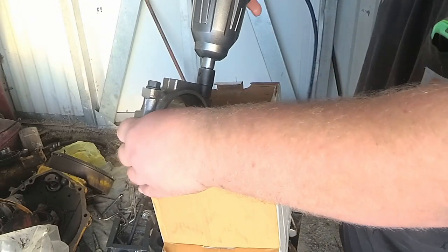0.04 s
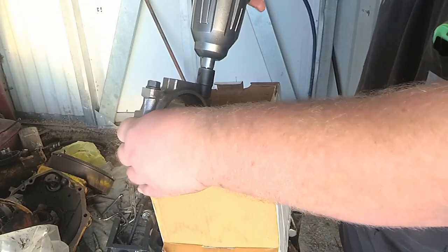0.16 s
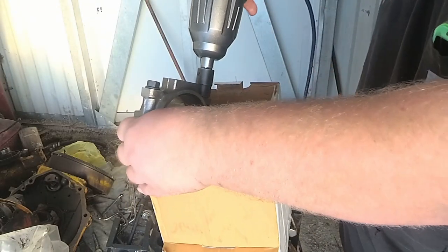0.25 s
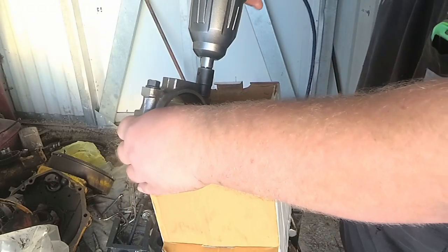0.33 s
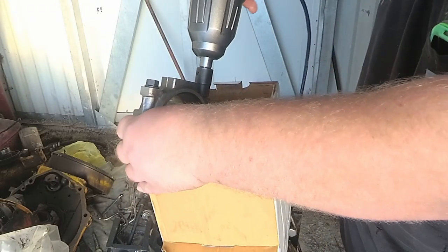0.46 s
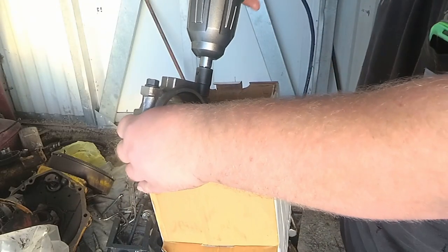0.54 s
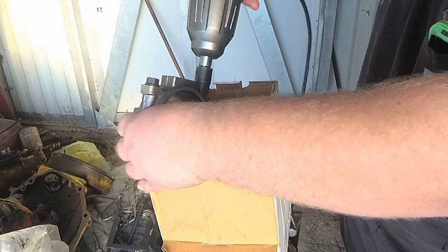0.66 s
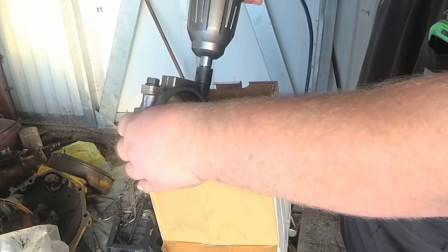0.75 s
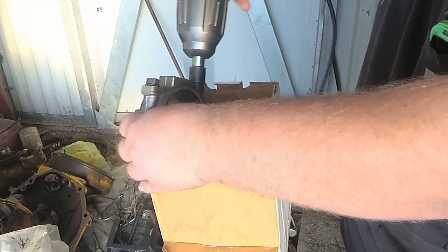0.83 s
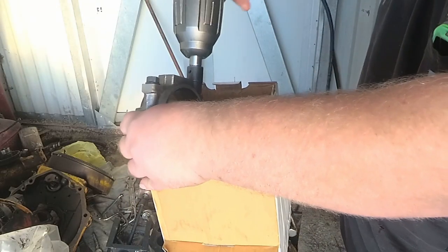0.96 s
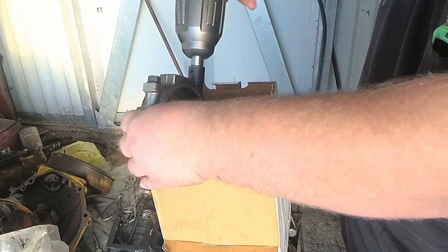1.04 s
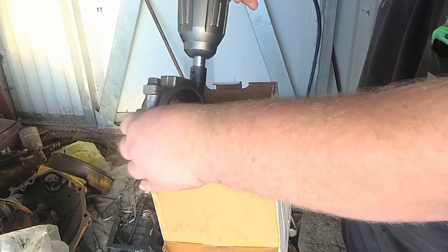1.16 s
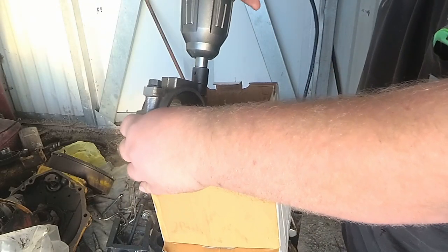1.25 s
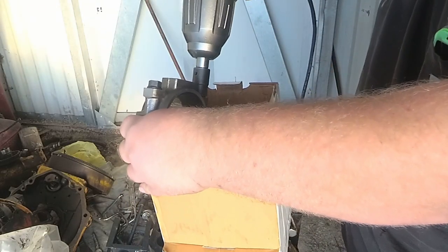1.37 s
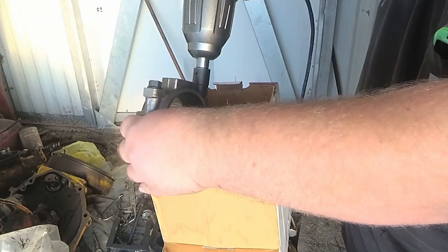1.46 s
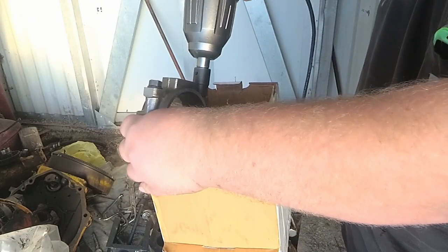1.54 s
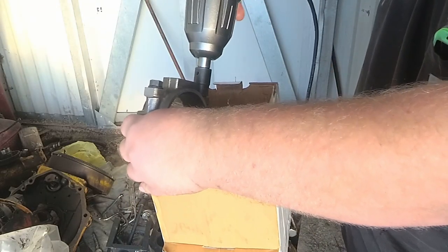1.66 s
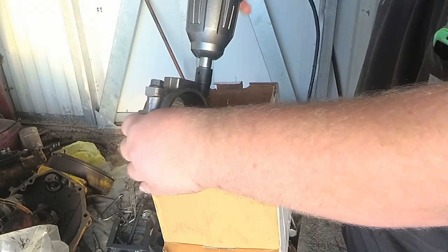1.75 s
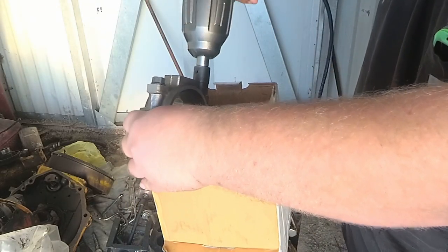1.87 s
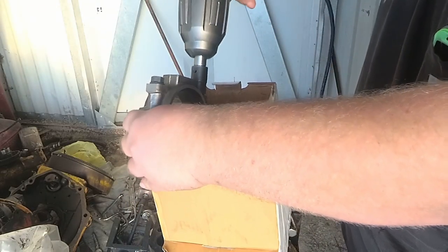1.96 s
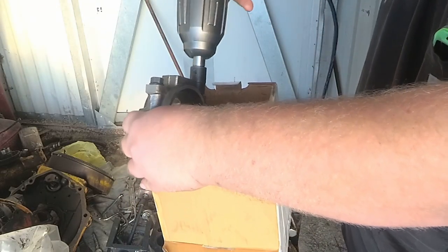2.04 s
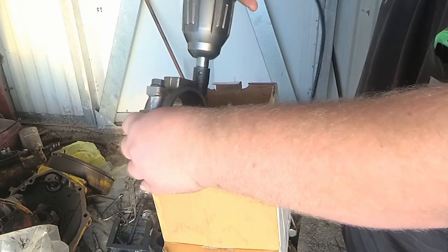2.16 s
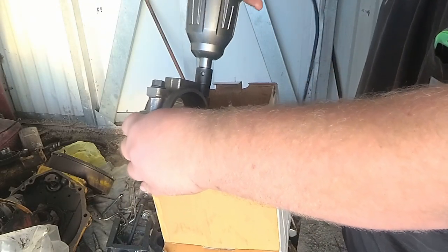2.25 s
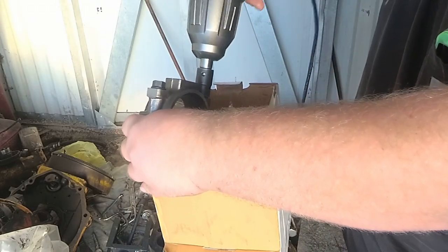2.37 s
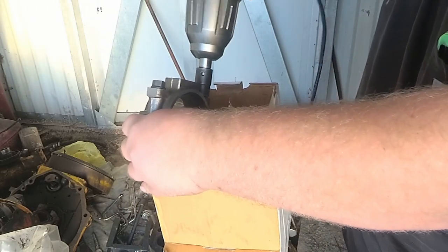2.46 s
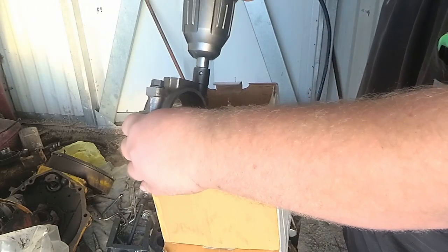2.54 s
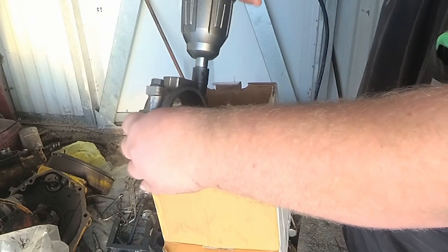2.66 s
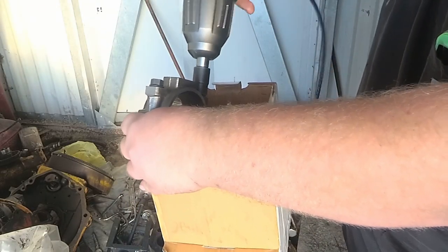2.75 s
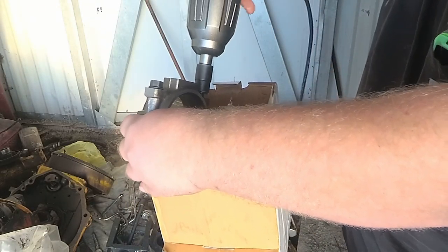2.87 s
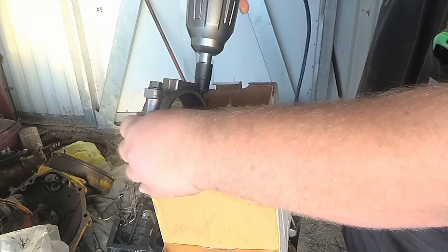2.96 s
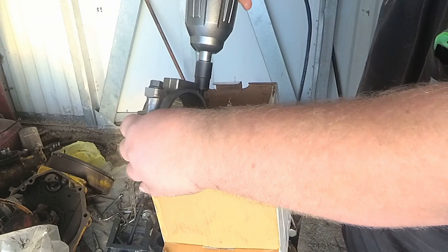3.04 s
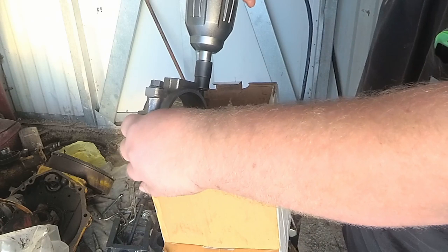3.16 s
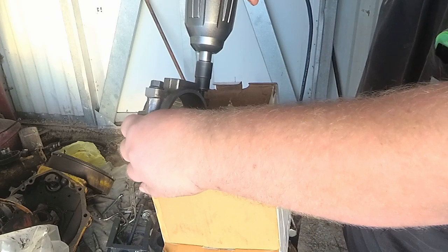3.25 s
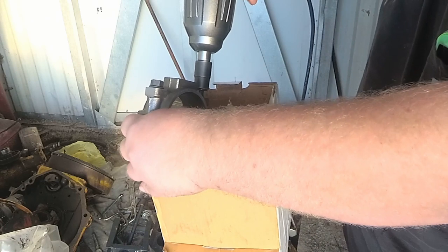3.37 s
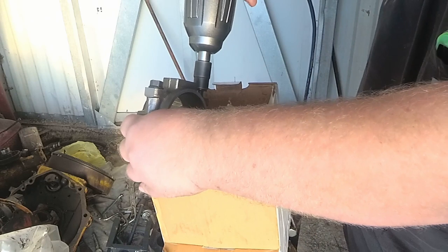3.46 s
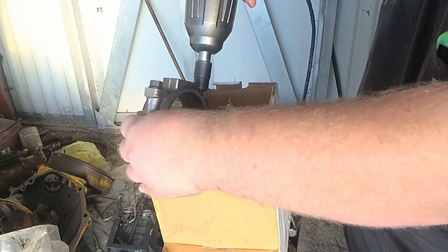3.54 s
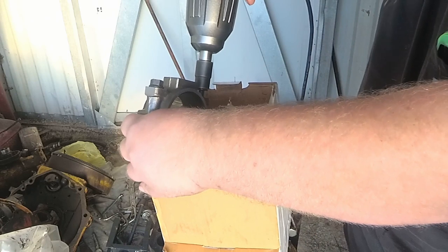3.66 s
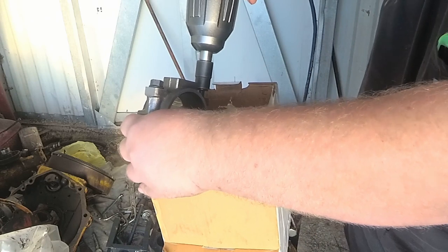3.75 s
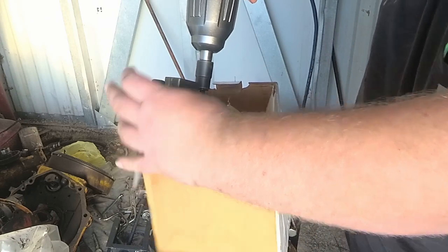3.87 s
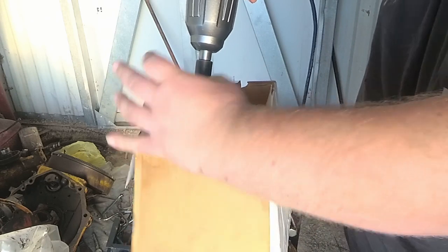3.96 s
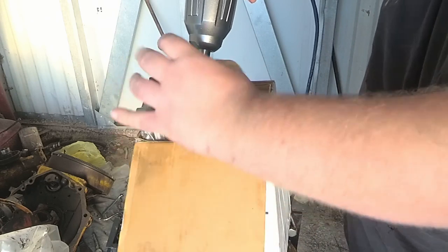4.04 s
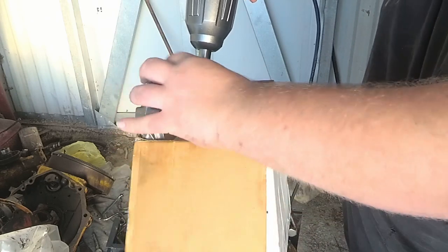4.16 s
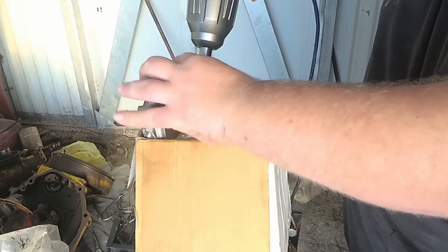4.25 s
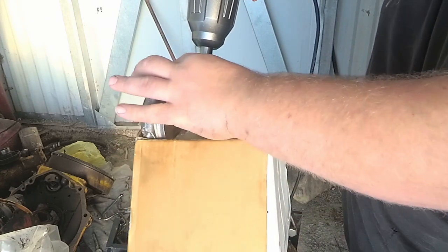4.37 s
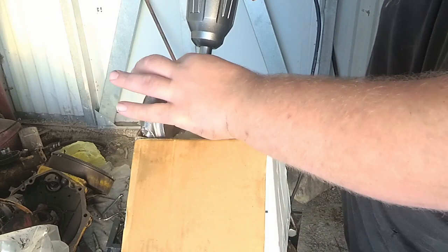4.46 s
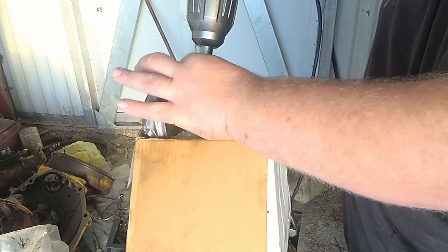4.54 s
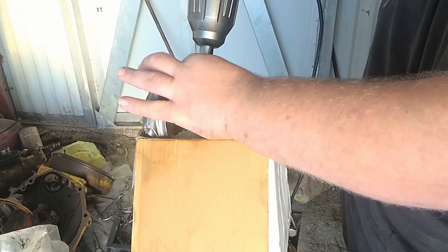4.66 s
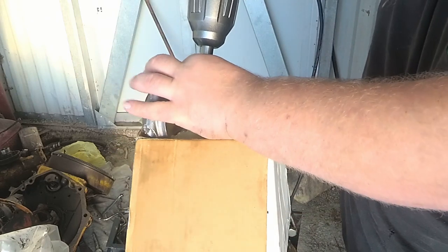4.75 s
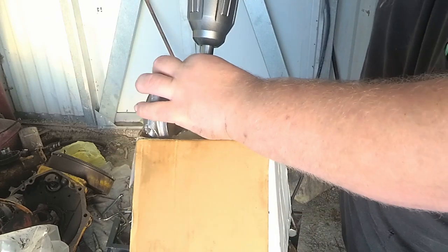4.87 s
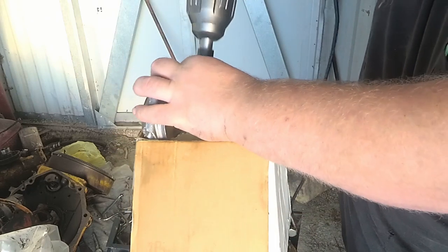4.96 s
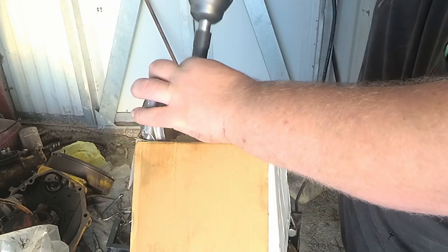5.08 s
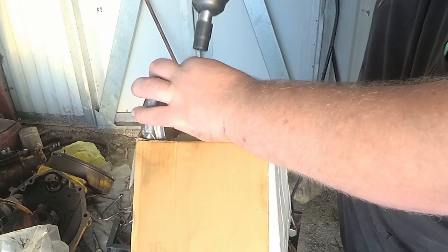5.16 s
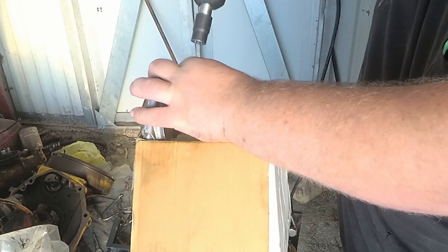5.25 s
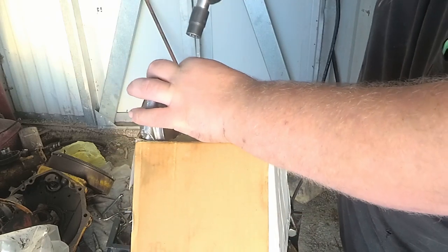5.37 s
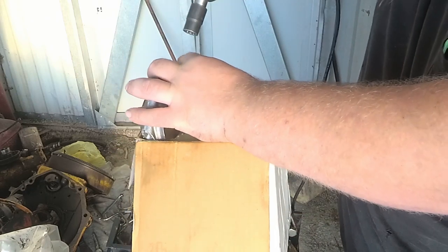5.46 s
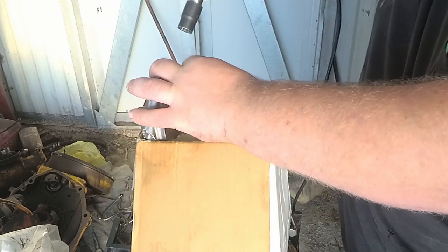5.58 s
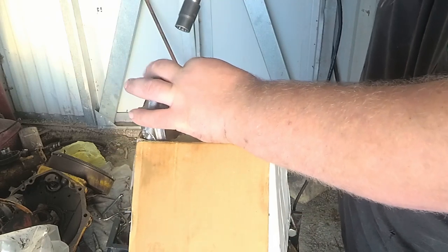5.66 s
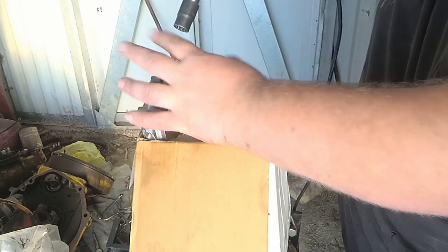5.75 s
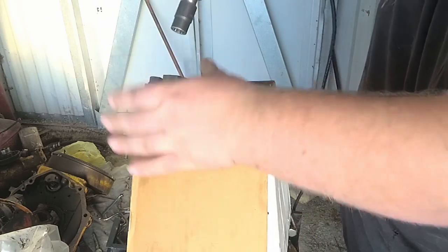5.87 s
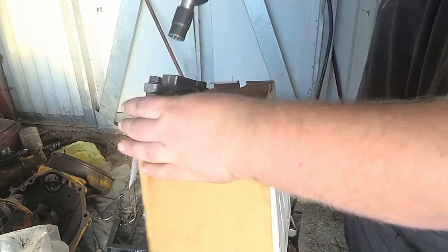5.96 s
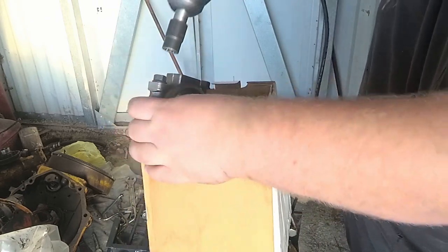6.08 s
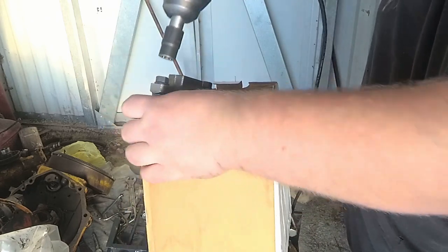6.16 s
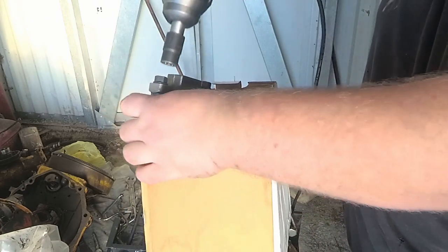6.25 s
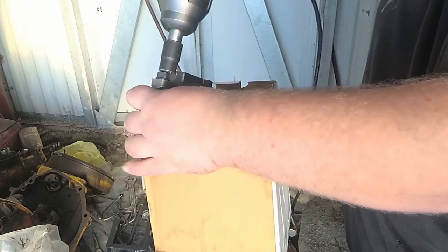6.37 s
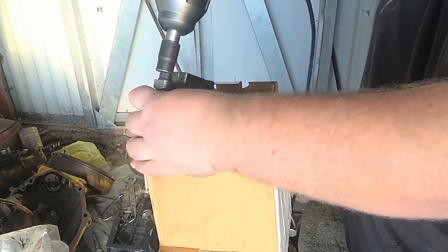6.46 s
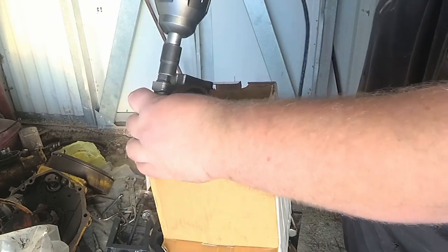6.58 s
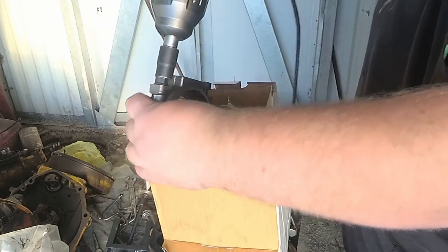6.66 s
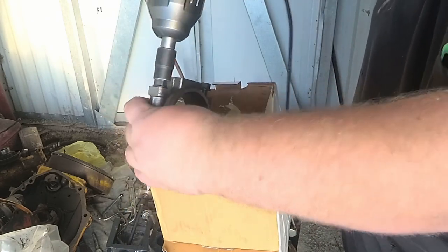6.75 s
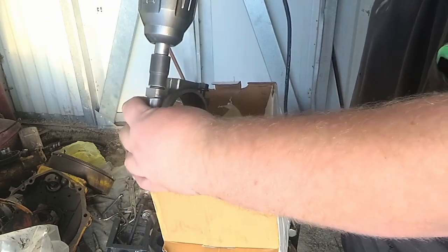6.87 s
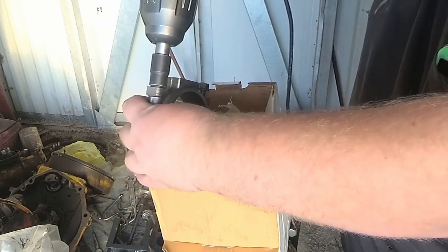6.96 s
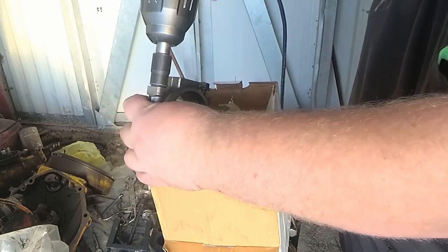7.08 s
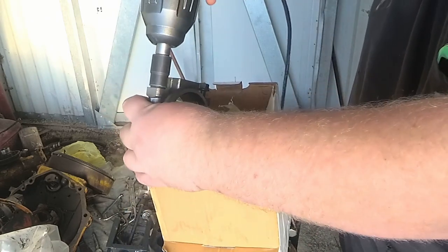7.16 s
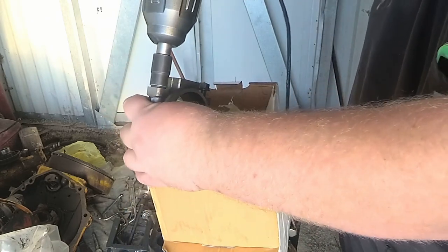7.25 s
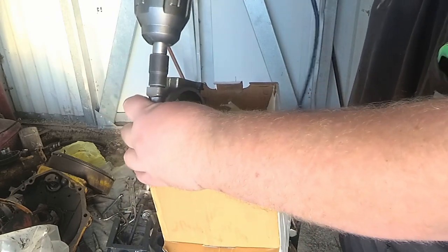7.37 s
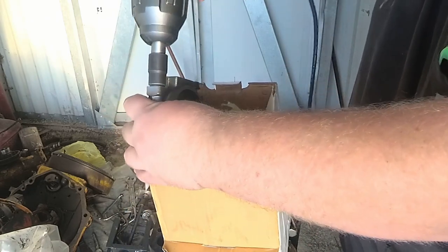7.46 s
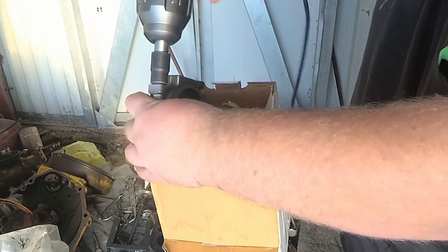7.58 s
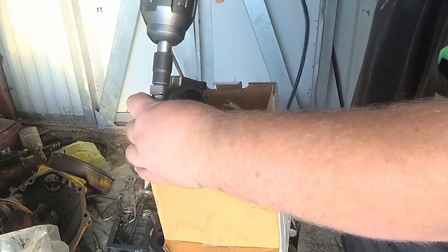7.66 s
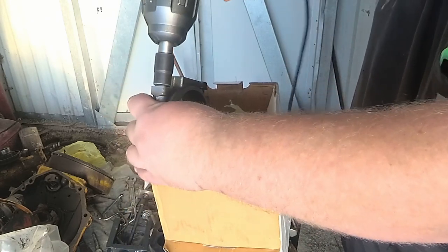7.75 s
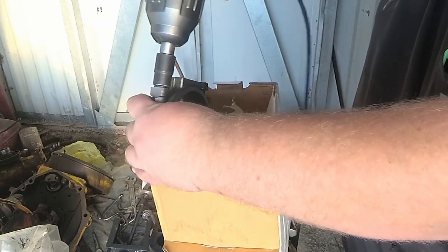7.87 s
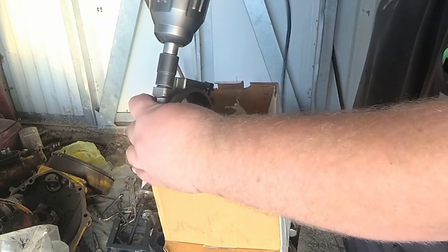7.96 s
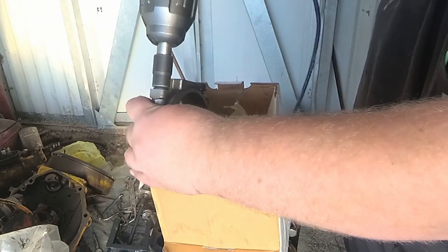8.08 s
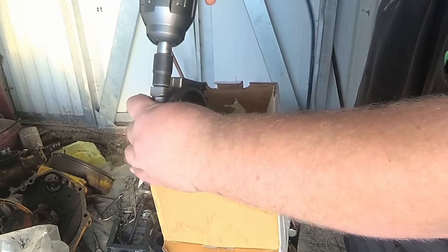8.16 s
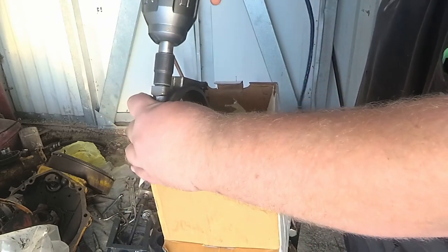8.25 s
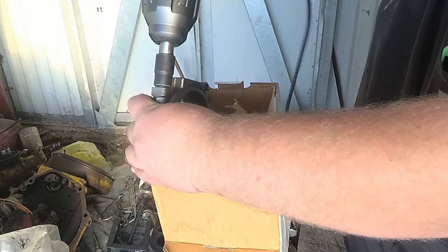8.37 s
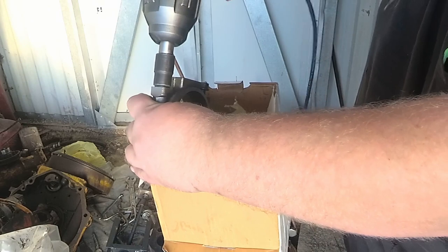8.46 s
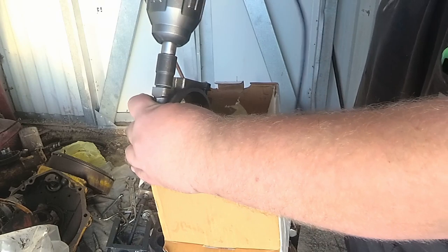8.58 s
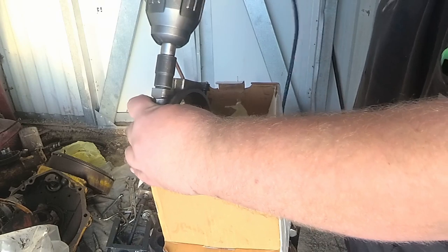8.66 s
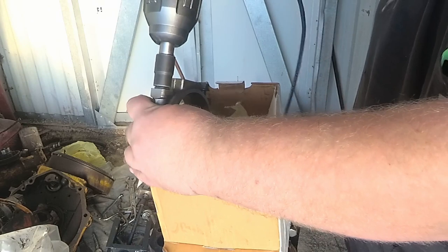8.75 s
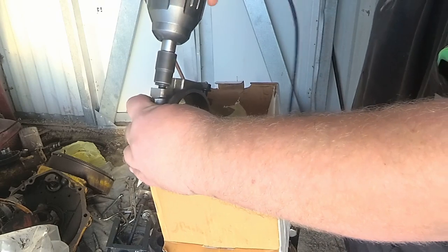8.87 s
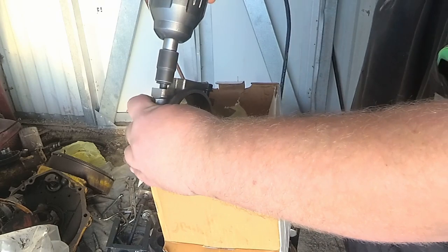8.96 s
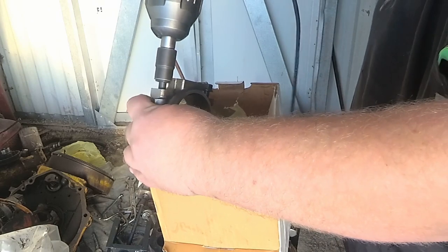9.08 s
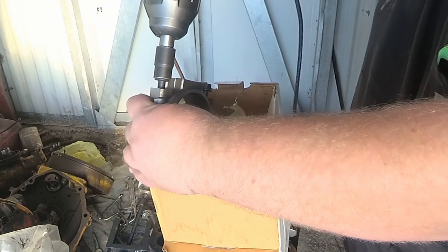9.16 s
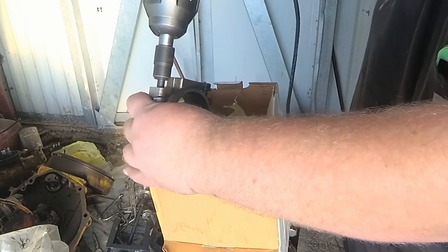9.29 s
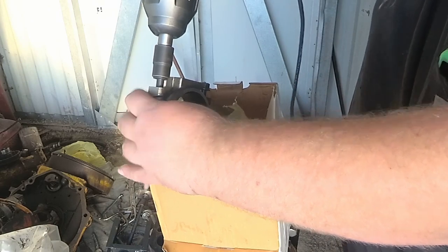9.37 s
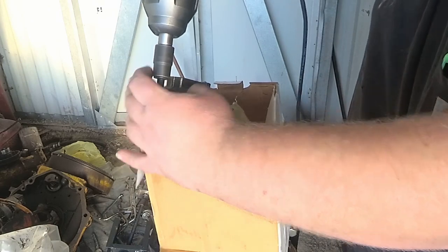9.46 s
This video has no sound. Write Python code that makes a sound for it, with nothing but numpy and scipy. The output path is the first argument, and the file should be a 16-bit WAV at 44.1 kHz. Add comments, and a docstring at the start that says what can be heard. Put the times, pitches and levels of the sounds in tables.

```python
"""An electric impact wrench hammers bolts loose on a part held on a wooden block, in a sheet-metal workshop.
Blows are noise bursts and ringing modes; gear rattle and brush hiss are coloured noise, free gears whine.
Twice the bolt runs free and the motor coasts down; between bolts hands scrape and brush, the socket clinks.
A close stereo microphone hears the tool on its right, with wall echoes and room noise; the loudest blows clip."""
import sys
import numpy as np
from scipy import signal
from scipy.fft import rfft, irfft
from scipy.io import wavfile
from scipy.ndimage import uniform_filter1d

SR = 44100
rng = np.random.default_rng(int(sys.argv[2]) if len(sys.argv) > 2 else 0)


def int16_out(signal):
    """Quantize to a 16-bit WAV file."""
    q = np.round(np.clip(np.atleast_2d(signal).T, -1, 1) * 32767)
    wavfile.write(sys.argv[1], SR, q.astype(np.int16))


N = 419832

# hammer on anvil, with the click of the trigger at 0.78 s among them: start_s, blow_db, jolt_db (through the
# bench)
BLOWS = [(0.768, -22.5, -67), (0.7798, -12, -56), (0.8193, -2.5, -46), (0.853, 3, -37), (0.867, -9, -44),
         (0.9008, 1.5, -44), (0.939, 5, -41), (0.9874, 1.5, -48.5), (1.057, 5.5, -44.5), (1.776, -18, -44),
         (1.8223, 6, -26), (1.8647, 5.5, -36.5), (1.914, 2, -42), (1.9435, -3, -48.5), (1.979, -0.5, -41),
         (2.03, 1, -22), (2.0544, -11, -23.5), (2.0804, -6, -47.5), (2.1124, -3.5, -42.5), (2.141, -4, -40),
         (2.1763, -1.5, -33), (2.219, -1.5, -31), (2.2741, -1.5, -43.5), (2.361, 3.5, -31),
         (2.5209, -3.5, -38.5), (2.5624, 1.5, -37), (2.599, -0.5, -33.5), (2.6336, -1.5, -25.5),
         (2.6626, -6, -35), (2.697, -1, -34.5), (2.724, -6, -37.5), (3.1514, -8.5, -33), (7.295, -22, -58),
         (7.323, -26, -59), (7.356, -14, -33), (7.3863, 4.5, -29), (7.4582, 6, -24), (7.541, 0.5, -39),
         (7.5985, -2.5, -39), (7.6901, 4.5, -43), (7.998, -12.5, -49), (8.0469, -8, -25.5),
         (8.08, 2.5, -32.5), (8.113, 0.5, -32), (8.147, -0.5, -31), (8.188, 0, -45), (8.2198, -2.5, -52),
         (8.2655, 1.5, -49), (8.349, 2, -21.5), (8.631, -22, -53), (8.671, -12, -33), (8.692, 2.5, -23),
         (8.7302, 3.5, -35), (8.7662, -2.5, -43), (9.3043, -8.5, -66)]
# one row a free run: rattle_db (at the reference speed), carrier_start (share of a turn)
FREE_RUNS = [(-30.5, 0.25), (-9.5, 0.66), (-9.5, 0.59)]
# likeness of the left and right microphone: pitch_hz, likeness (0 to 1)
LIKENESS = [(60, 0.26), (120, 0.45), (240, 1), (480, 0.94), (950, 0.77), (1890, 0.46), (3770, 0.73),
            (7520, 0.14), (15000, 0.16)]


def hammer():
    """Each blow: chatter of case, thump of block, crack, a jolt through the bench, one rebound, ringing steel."""
    # block under the hammer: pitch_hz, level_db (per Hz)
    block_colour = [(88, -36), (150, -12.5), (238, 2), (399, 3.5), (522, -4.5), (591, 1.5), (639, -5.5),
                    (895, -2), (1060, -3), (1240, 3.5), (2200, -20), (2860, -37.5), (4840, -120)]
    # hiss of the crack: pitch_hz, level_db (per Hz)
    crack_colour = [(3530, -32.5), (6000, -3), (6230, -8.5), (7610, -6.5), (9980, -7.5), (11200, -4.5),
                    (14600, -4.5), (15600, -10), (16000, -29.5)]
    # shocks through the bench: pitch_hz, level_db (per Hz)
    jolt_colour = [(15, -7.5), (40, -14.5), (100, -1), (180, 4.5), (260, -1.5), (500, -51.5)]
    # modes of the bolted steel part: pitch_hz, level_db, t60_s
    steel_modes = [(2390, -22, .55), (2440, -24, .5), (2880, -23, .6), (2960, -22, .85), (3030, -21.5, .8),
                   (3100, -24, .55), (3900, -2, .12), (4180, -3, .13), (4370, -5, .1), (5430, -6, .2),
                   (5700, -8, .12)]
    # parts of the case that a blow may favour: low_hz, high_hz
    case_parts = [(0, 2700), (2700, 3600), (3600, 4900), (4900, 22050)]
    colour_spread_db, clang_spread_db = 3, 5

    start, blow_db, jolt_db = np.transpose(BLOWS)
    late, low, high, *favour = rng.uniform(-1, 1, (len(start), 3 + len(case_parts))).T
    thump_db = blow_db - 16 + colour_spread_db * low
    crack_db = blow_db - 9 + colour_spread_db * high
    rebound = start + .021 * (1 + .1 * late)  # about 21 ms after the blow

    def hit(db):
        return strikes(start, db - 5) + strikes(rebound, db - 11)

    def shake(db):
        return 0.63 * burst(hit(db), 0.0016, 0.08) + 0.52 * burst(hit(db), 0.0007, 0.022)

    case, block, treble, bench = voices(housing, block_colour, crack_colour, jolt_colour)
    # socket and anvil knock in their play
    loose = grit(per_s=190, spread_db=3.0, smooth=.8, knock_s=.0035)
    chatter = np.zeros((2, N))
    for (lo, hi), favoured in zip(case_parts, favour):
        part = shaped(case, lambda hz: (hz >= lo) & (hz < hi))
        chatter += part * shake(blow_db + clang_spread_db * favoured)
    crack = burst(hit(crack_db), .0002, 0.06) + 0.67 * burst(strikes(start, crack_db), .0001, 0.0054)
    thump = block * burst(hit(thump_db), 0.0046, 0.11)
    left_right = gain_of([[-7], [2.5]])
    jolt = left_right * bench * burst(strikes(start, jolt_db), 0.00047, 0.13)
    steel = ring(strikes(start, blow_db - 25.5), steel_modes)
    return loose * (chatter + treble * crack) + thump + jolt + steel


def motor():
    """Noise rattle of gears, drone and hum of the shell and brush hiss, with the free gears' whine and throb."""
    # shell of the running tool: pitch_hz, level_db (per Hz)
    drone_colour = [(40, -29.5), (100, -29), (200, -6.5), (310, -4.5), (530, -4), (680, -9.5), (780, -8.5),
                    (820, -5), (865, -5), (1100, -9.5), (1440, -5.5), (2000, -3.5), (2600, -34.5),
                    (4400, -100)]
    # brushes and fan: pitch_hz, level_db (per Hz)
    brush_colour = [(4500, -19.5), (6200, 3.5), (7000, -6), (8300, -3.5), (9300, -9), (10200, -8),
                    (10850, -5.5), (11800, -10), (13200, -3.5), (14300, -11.5), (15300, -9.5), (16200, -24)]
    # steady hum of the shell: pitch_hz, level_db (per Hz)
    hum_colour = [(90, -25.5), (220, -9.5), (420, -9), (720, -17), (790, -3), (820, 2), (855, -7.5),
                  (950, -20.5), (1400, -24), (3000, -60)]
    whine, throb = gears()
    layers = voices(housing, drone_colour, brush_colour, hum_colour) * turning()[:, None]
    rattle = layers.sum(0) * grit(per_s=520, spread_db=3.5, smooth=2.1, knock_s=0.0023)
    sound = throb * gain_of(-4.5) * rattle + throb ** 1.4 * whine
    return shaped(sound, lambda hz: hz ** 3 / (hz ** 3 + 130 ** 3))  # the motor sounds with little below about 130 Hz


def gears():
    """Free-running gear teeth: a rough whine on the mesh multiples, and a throb once a carrier turn."""
    # multiples of the tooth mesh: multiple, coasting_db, driven_db
    mesh_orders = [(1, 3, -4), (2, -1.5, 8), (3, 4, -3), (4, 1.5, -3), (5, -2, -6), (6, -4, -7)]
    # path from teeth to air: pitch_hz, level_db
    mesh_path = [(150, -7), (260, 2), (350, 2), (520, 5), (620, -8), (800, -10), (1150, -10), (1550, 4.5),
                 (2050, -3), (2300, 9), (2480, -2), (3150, 12), (3600, 5), (4050, 12), (4700, 2), (5500, 8),
                 (6500, -4), (8000, -8)]
    # one whine level a free run, at the reference speed, before order and path: level_db
    whine_levels = [-41, -31.5, -32]
    meshes_per_turn = 49.6  # of the gear carrier
    whine_db_per_halving, drive_fade_s = 8.5, .045
    throb_db, throb_db_per_halving, throb_most_db = 1.8, 2.0, 3.2
    throb_fades_hz = 260  # below this mesh speed the throb evens out

    whine, throb = np.zeros(N), np.ones(N)
    for (on, since, hz), (_, carrier_start), whine_db in zip(free_runs(), FREE_RUNS, whine_levels):
        whine_db = whine_db - whine_db_per_halving * halvings(hz)
        depth_db = np.clip(throb_db + throb_db_per_halving * halvings(hz), 0, throb_most_db)
        depth_db = depth_db * np.minimum(hz / throb_fades_hz, 1)
        # driven while the speed rises, coasting while it falls
        fade = np.exp(-1 / (drive_fade_s * SR))
        driven = signal.lfilter([1 - fade], [1, -fade], np.gradient(hz) > 0, zi=[1.])[0]
        meshes = np.cumsum(hz) / SR
        edges = np.minimum(np.minimum(since, since[::-1]) / .02, 1)  # 20 ms fades
        turn = np.cos(2 * np.pi * (meshes / meshes_per_turn + carrier_start))
        throb[on] = gain_of(edges * depth_db * turn)
        for k, coast_db, driven_db in mesh_orders:
            # uneven teeth smear every multiple on its own, the high ones most
            keep = np.exp(-np.pi * (25 + 26 * k) / SR)
            flutter = signal.lfilter([1], [1, -2 * keep, keep ** 2], rng.standard_normal((2, len(hz))))
            flutter = .65 + .55 * (evened(flutter[0]) + 1j * evened(flutter[1]))
            order_db = coast_db + (driven_db - coast_db) * driven
            level = edges * gain_of(whine_db + order_db + read(mesh_path, k * hz))
            whine[on] += (level * flutter * np.exp(2j * np.pi * k * meshes)).real
    return whine, throb


def turning():
    """Gains of rattle, drone, hiss and hum: trigger pulls, the shake after each blow, and speed when free."""
    # trigger pulls against a tight bolt: start_s, let_go_s, pull_db
    pulls = [(0.791, 0.992, -15), (1.774, 2.25, -17.5), (2.473, 2.73, -17.5), (7.306, 7.62, -12),
             (7.992, 8.283, -13), (8.63, 8.8, -16.5)]
    # The next five hold one value a layer: rattle, drone, hiss, hum.
    # at the start of a pull, relative to the loaded level: level_db
    spin_up_db = np.c_[[-20, -14.5, -36, -13]]
    # under load, relative to the pull: level_db
    loaded_db = np.c_[[0.5, -9, -5.5, -25]]
    # rattling on after a blow, relative to the blow: level_db
    shaken_db = np.c_[[-15, -21.5, -24, -36.5]]
    # turning free, relative to the free run: level_db
    free_db = np.c_[[-1, -23.5, -8, -23]]
    # loss as the speed halves: loss_db
    db_per_halving = np.c_[[8.25, 3.6, 10.5, 14]]
    spin_up_s, stop_db_per_s, shaken_t60_s, break_free_s = 0.056, 144, 0.28, 0.1

    t, power = np.arange(N) / SR, np.zeros((4, N))
    for start, end, pull_db in pulls:
        rising = np.clip(1 - (t - start) / spin_up_s, 0, 1)
        pull_db = pull_db - stop_db_per_s * np.maximum(t - end, 0)
        power += (t > start) * gain_of(pull_db + loaded_db + spin_up_db * rising) ** 2
    start, blow_db, _ = np.transpose(BLOWS)
    # doubled dB and halved decay time, because powers add here
    shaken = abs(burst(strikes(start, 2 * blow_db), 0.0035, shaken_t60_s / 2))
    power += gain_of(shaken_db) ** 2 * shaken
    for (on, since, hz), (rattle_db, _) in zip(free_runs(), FREE_RUNS):
        level = gain_of(rattle_db + free_db - db_per_halving * halvings(hz))
        power[:, on] += np.minimum(since / break_free_s, 1) * level ** 2
    return np.sqrt(abs(uniform_filter1d(power, size=130)))


def free_runs():
    """For each unloaded turn of the gears: samples, seconds since its start, tooth mesh frequency."""
    # gear speed, one table a free run: time_s, mesh_hz
    speeds = [
        [(.79, 1130), (.87, 1200)],
        [(2.71, 930), (2.79, 1135), (2.93, 1285), (3.034, 1190), (3.192, 1020), (3.608, 638), (3.932, 409),
         (4.172, 242), (4.4, 115), (4.52, 55), (4.58, 6)],
        [(8.8, 1080), (8.875, 1155), (8.91, 1120), (8.95, 1015), (9.03, 895), (9.2, 725), (9.33, 622),
         (9.52, 490)],
    ]
    t = np.arange(N) / SR
    for rows in speeds:
        s, hz = np.transpose(rows)
        on = (t > s[0]) & (t < s[-1])
        yield on, t[on] - s[0], np.interp(t[on], s, hz)


def halvings(hz):
    """How many times the mesh speed has halved from the reference of 1000 Hz."""
    return np.log2(1000 / hz)


def housing(hz):
    """Gain of the gear case: a sum of broad resonances."""
    # resonances: pitch_hz, width_hz, level_db
    resonances = [(2360, 210, -9.5), (2892, 870, -0.5), (3188, 390, 1.5), (3938, 140, 5.5),
                  (4244, 443, 4.5), (4500, 3330, -10.5), (5540, 540, -1), (7230, 530, -12)]
    power = sum(gain_of(2 * db) / (1 + (2 * (hz - f) / width) ** 2) ** 1.54 for f, width, db in resonances)
    return np.sqrt(power)


def hands():
    """Sliding, clinks and knocks: noise bursts of steel, wood and skin, with ringing socket and block."""
    # steel on steel: pitch_hz, level_db (per Hz)
    scrape_colour = [(1180, -35), (2000, -20), (2670, -3), (3310, 0), (4150, -1), (4850, -8), (5290, -5.5),
                     (6640, -16), (7500, -19), (9750, -44), (16500, -120)]
    # block under hands: pitch_hz, level_db (per Hz)
    wood_colour = [(24, -58), (40, -24), (119, -9.5), (245, -0.5), (626, -8.5), (740, -8), (804, -9.5),
                   (936, -9.5), (1570, -16), (2200, -15.5), (2860, -23), (4840, -120)]
    # skin and cloth: pitch_hz, level_db (per Hz)
    skin_colour = [(4120, -12), (7000, -6), (7930, -3), (10500, -5), (12600, -2.5), (16000, -2.5)]
    # socket ticking on a bolt, sliding off and on: start_s, level_db
    clink_times = [(.137, -51), (.277, -53), (.53, -57), (1.69, -55.5), (4.6528, -51.5), (4.9556, -44),
                   (4.9876, -45), (5.023, -40), (5.0487, -41), (5.064, -42), (5.0714, -31.5), (5.357, -44),
                   (5.366, -32.5), (5.378, -41), (5.389, -41), (5.4, -44), (5.4094, -43), (5.421, -45),
                   (5.4335, -34), (5.452, -43), (5.47, -47), (5.5503, -29.5)]
    # modes of the loose socket: pitch_hz, level_db, t60_s
    socket_modes = [(3030, -4, 0.029), (3290, -2.5, .045), (3620, 2, 0.049), (4120, -4, .05),
                    (4570, -3.5, 0.032), (5130, -16, 0.069), (8180, -14, .13), (8340, -12.5, .17)]
    # part and socket knocking against the block: start_s, wood_db, steel_db
    knock_times = [(5.733, -43, -50), (5.954, -36, -39), (6.148, -26, -40), (6.316, -38, -43),
                   (6.379, -29.5, -12), (6.509, -36, -41), (6.601, -33.5, -50), (6.64, -32, -39),
                   (6.669, -33, -52), (6.773, -43, -62), (6.796, -32, -30), (6.819, -31, -38),
                   (6.859, -38, -52), (6.953, -31.5, -32.5), (7.067, -39, -53), (7.129, -37, -57),
                   (7.179, -32.5, -36.5), (7.87, -37, -25), (8.579, -42.5, -63)]
    # modes of the block: pitch_hz, level_db, t60_s
    block_modes = [(248, 4, 0.06), (338, 0, 0.084), (444, 2, 0.041), (616, -7.5, 0.16), (800, -13, 0.047)]
    steel, wood, skin = layers = voices(scrape_colour, wood_colour, skin_colour)

    def taps(start, steel_db, wood_db, skin_db):
        click = steel * burst(strikes(start, steel_db - 7.5), 0.00036, 0.039)
        thump = wood * burst(strikes(start, wood_db - 7), 0.0037, 0.11)
        crack = skin * burst(strikes(start, skin_db - 1.5), .0003, 0.032)
        return click + thump + crack

    slide = (layers * shuffling()[:, None]).sum(0)
    slide = slide * grit(per_s=440, spread_db=2.5, smooth=1.2, knock_s=0.0024)
    start, db = np.transpose(clink_times)
    clinks = taps(start, db, db - 21, db - 19) + ring(strikes(start, db - 10), socket_modes)
    start, wood_db, steel_db = np.transpose(knock_times)
    knocks = taps(start, steel_db, wood_db - 6.5, steel_db - 9.5)
    knocks = knocks + ring(strikes(start, wood_db - 8.5), block_modes)
    # the hands give little deep bass
    return shaped(slide + clinks + knocks, lambda hz: hz ** 2 / (hz ** 2 + 90 ** 2))


def shuffling():
    """Gains of scrape, rumble and hiss: the sliding part and the brushing hand."""
    # the part being shifted on the block: time_s, level_db
    slide_points = [(4.85, -72), (5.06, -58.5), (5.16, -78), (5.42, -65), (5.72, -70), (5.9, -63),
                    (6.17, -53.5), (6.36, -56.5), (6.47, -52.5), (6.95, -54), (7.18, -49.5), (7.3, -47),
                    (7.8, -43.5), (7.97, -44), (8.0, -35)]
    # sliding, one value each for scrape, rumble, hiss: level_db
    slide_db = np.c_[[-2, 5.5, -15.5]]
    # a hand brushing past the part: middle_s, length_s, level_db
    hand_brushes = [(5.09, 0.13, -52), (5.434, 0.13, -56), (5.817, .18, -49), (5.981, 0.1, -46),
                    (6.234, .14, -54), (6.397, 0.1, -46)]
    # brushing, one value each for scrape, rumble, hiss: level_db
    brush_db = np.c_[[-6.5, -15, -1.5]]
    t = np.arange(N) / SR
    gains = gain_of(np.interp(t, *np.transpose(slide_points), left=-200, right=-200) + slide_db)
    for middle, length, db in hand_brushes:
        gains = gains + gain_of(db + brush_db) * np.exp(-(3.6 * (t - middle) / length) ** 2)
    return uniform_filter1d(gains, size=130)


def walls(x):
    """Sparse taps of random sign, each band dying at its own speed; the two ears share the long waves."""
    # decay of the workshop: pitch_hz, t60_s
    decay = [(150, 0.35), (400, 0.39), (1000, 0.28), (3000, 0.3), (8000, 0.34), (15000, 0.23)]
    taps = np.zeros((3, 2, SR // 2))
    # one tap in every 20 samples
    at = np.arange(300, SR // 2 - 20, 20) + rng.integers(0, 20, (3, 2, (SR // 2 - 301) // 20))
    np.put_along_axis(taps, at, rng.choice([-1., 1.], at.shape), 2)
    hz, t, bands = signal.stft(taps, SR, nperseg=256)
    same = np.clip(read(LIKENESS, hz), 0, 1)[:, None]
    bands[:, 0] = same * bands[:, 1] + np.sqrt(1 - same ** 2) * bands[:, 0]
    tails = signal.istft(bands * gain_of(-60 * t / read(decay, hz)[:, None]), SR, nperseg=256)[1]
    # the echo blends in turn among three tails, so that no steady tones stand out
    blend = np.cos(np.pi * (7 * np.arange(N) / SR + np.arange(3)[:, None] / 3)) * np.sqrt(2 / 3)
    echo = np.zeros((2, N))
    for share, tail in zip(blend, tails):
        # the right channel alone feeds both ears' echoes
        echo += signal.oaconvolve(x[1:] * share, tail / np.linalg.norm(tail[1]), axes=1)[:, :N]
    return echo


def air():
    """The quiet of the workshop and the microphone's own hiss, as steady coloured noise."""
    # room and microphone noise: pitch_hz, level_db (per Hz)
    air_colour = [(15, -59.5), (25, -33), (134, -9), (161, -11), (190, -4), (277, -6), (344, -4),
                  (451, -10.5), (1520, -20), (2000, -19.5), (3620, -20), (14800, -21.5), (16000, -39.5)]
    return gain_of(-56) * evened(shaped(noise_pair(), lambda hz: gain_of(read(air_colour, hz))))


def strikes(s, db):
    """A train of impulses."""
    train = np.zeros(N)
    train[np.round(s * SR).astype(int)] = gain_of(db)
    return train


def burst(train, rise_s, t60):
    """Envelope that jumps up at each impulse and dies away."""
    t = np.arange(SR // 4) / SR
    return signal.oaconvolve(train, (1 - np.exp(-t / rise_s)) * gain_of(-60 * t / t60))[:N]


def ring(train, modes):
    """Each impulse sets the modes ringing as decaying sines, by chance amounts."""
    t = np.arange(SR) / SR
    sound = np.zeros(N)
    for hz, db, t60 in modes:
        chance = rng.uniform(0.9, 1.5, N) * rng.choice([-1., 1.], N)
        mode = gain_of(db - 60 * t / t60) * np.sin(2 * np.pi * hz * t)
        sound += signal.oaconvolve(train * chance, mode)[:N]
    return sound


def grit(per_s, spread_db, smooth, knock_s):
    """Level flicker of many small knocks and slips, rms 1."""
    sizes = gain_of(spread_db * np.minimum(rng.exponential(1, N), 4))
    knocks = sizes * (rng.random(N) < per_s / SR)
    flicker = signal.lfilter([1], [1, -np.exp(-1 / (knock_s * SR))], knocks)
    return evened(smooth + evened(flicker))


def voices(*spectra):
    """Noise pairs of rms 1 in each colour, given as a table or as gain(hz)."""
    colours = [c if callable(c) else lambda hz, c=c: gain_of(read(c, hz)) for c in spectra]
    return np.array([evened(shaped(noise_pair(), c)) for c in colours])


def noise_pair():
    """White noise at two microphones, partly alike."""
    right, other = rng.standard_normal((2, N))
    same = lambda hz: np.clip(read(LIKENESS, hz), 0, 1)
    left = shaped(right, same) + shaped(other, lambda hz: np.sqrt(1 - same(hz) ** 2))
    return np.array([left, right])


def shaped(x, gain):
    """Filters x by gain(hz)."""
    return irfft(rfft(x) * gain(np.fft.rfftfreq(N, 1 / SR)), N)


def read(points, hz):
    """A spectrum table, straight lines over log frequency."""
    f, value = np.transpose(points)
    return np.interp(np.log(hz + 1), np.log(f + 1), value)


def evened(x):
    """Scales to rms 1."""
    return x / np.sqrt(np.mean(x ** 2) + 1e-20)


def gain_of(db):
    """Decibels to amplitude."""
    return 10 ** (np.asarray(db) / 20)


def scene():
    """Tool and hands, nearer the right microphone, in the workshop."""
    # balance of the microphones: pitch_hz, left_minus_right_db
    balance = [(60, -7.5), (100, -3.5), (180, -5), (310, -4), (550, -2), (950, -3.5), (1650, -8.5),
               (2860, -4.5), (4970, -8), (8640, -3.5), (15000, -13.5)]
    near = motor() + hammer() + hands()
    heard = near + gain_of(-6.5) * walls(near)
    lean = lambda hz: gain_of(np.array([[.5], [-.5]]) * read(balance, hz))
    return shaped(heard, lean) + air() * gain_of([[-1.0], [1.0]])


def record(dry):
    """Peaks are clipped flat at full scale; then a low-pass removes what lies above 15.5 kHz."""
    clipped = np.clip(dry, -1, 1)
    low_pass = signal.firwin(511, 15500, window=("kaiser", 9), fs=SR)
    return signal.oaconvolve(clipped, low_pass[None], "same")


dry = scene()
out = record(dry)
int16_out(out)
```